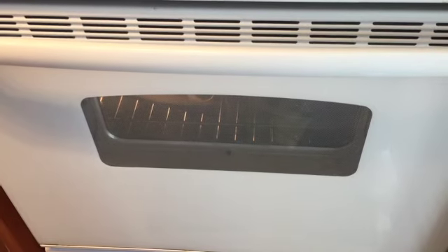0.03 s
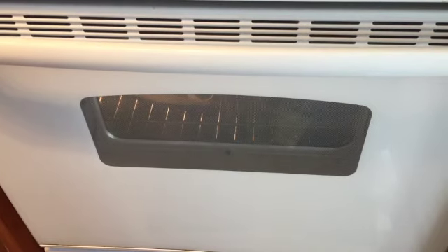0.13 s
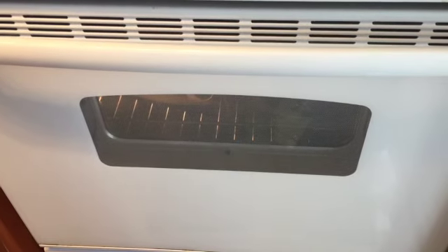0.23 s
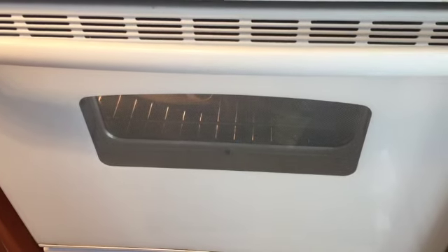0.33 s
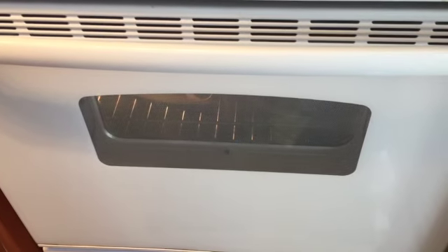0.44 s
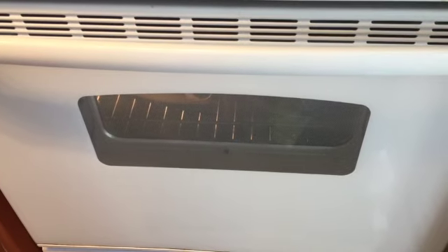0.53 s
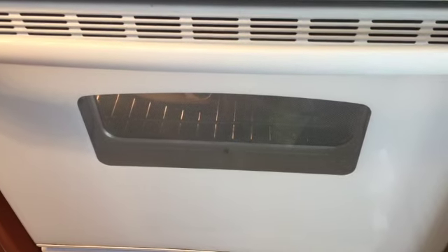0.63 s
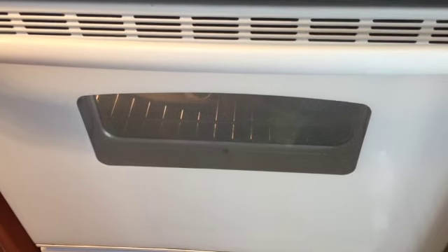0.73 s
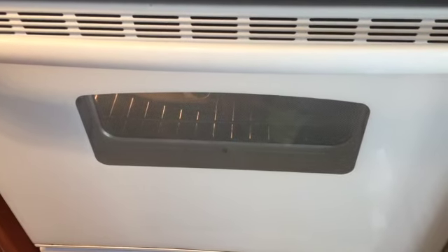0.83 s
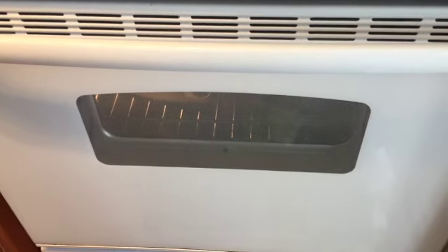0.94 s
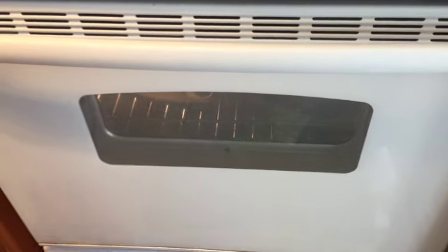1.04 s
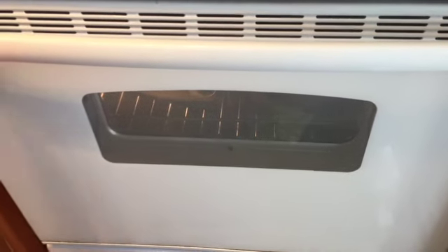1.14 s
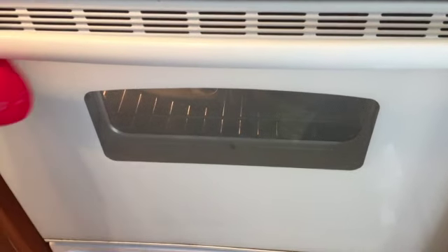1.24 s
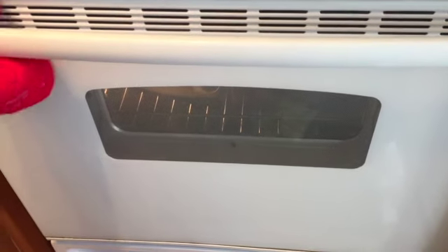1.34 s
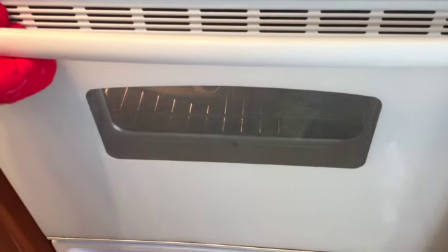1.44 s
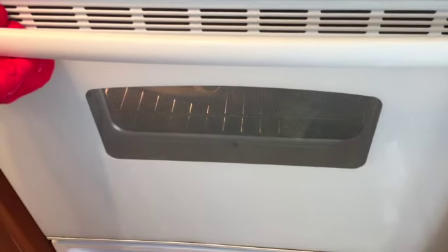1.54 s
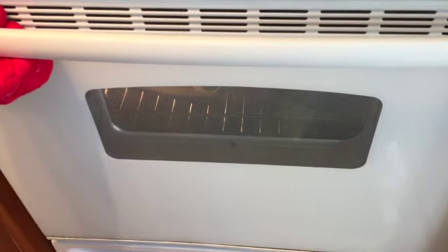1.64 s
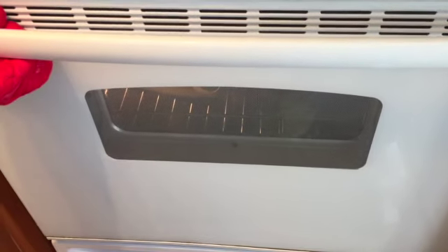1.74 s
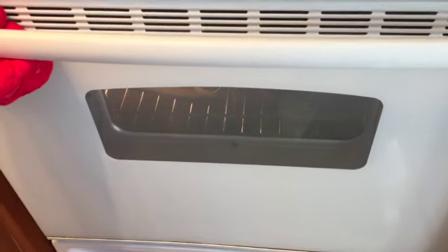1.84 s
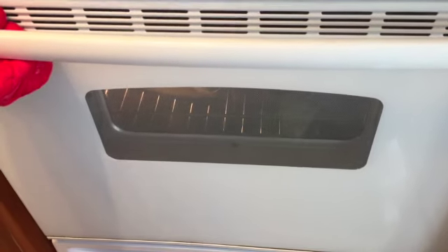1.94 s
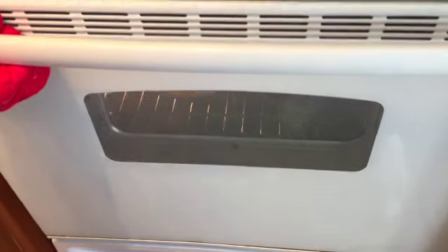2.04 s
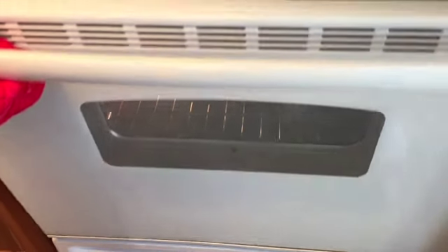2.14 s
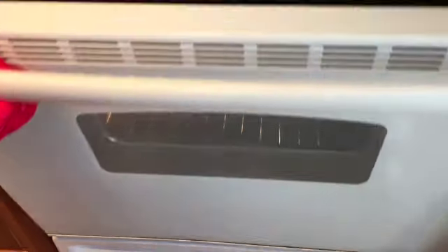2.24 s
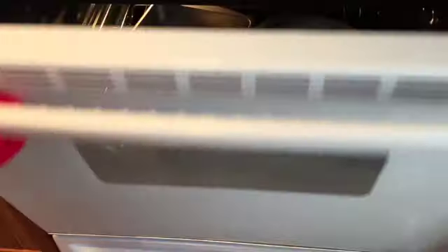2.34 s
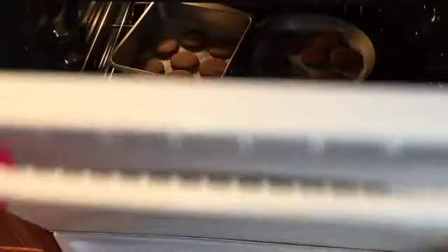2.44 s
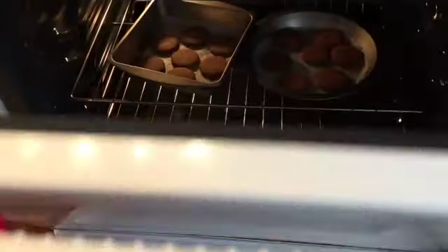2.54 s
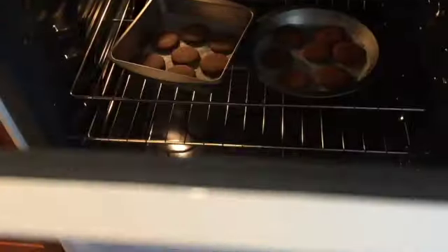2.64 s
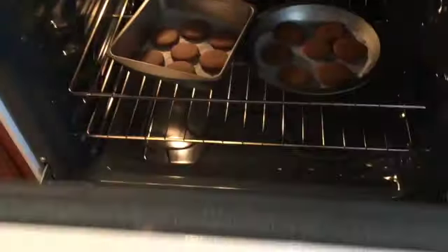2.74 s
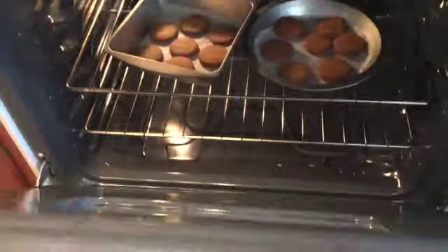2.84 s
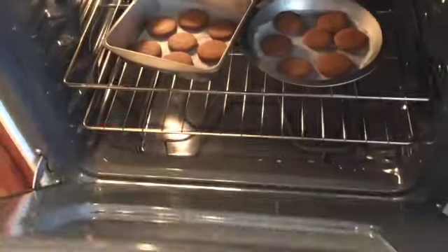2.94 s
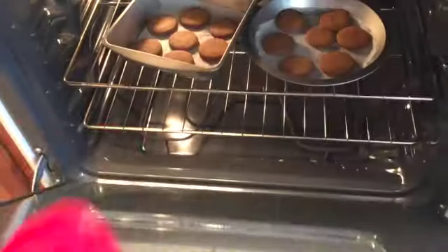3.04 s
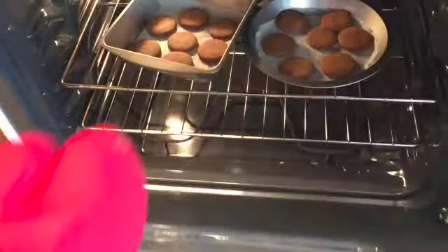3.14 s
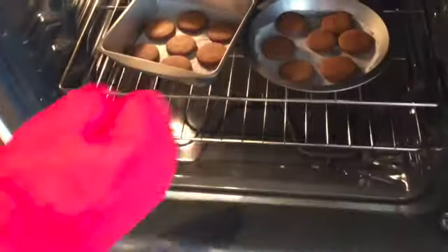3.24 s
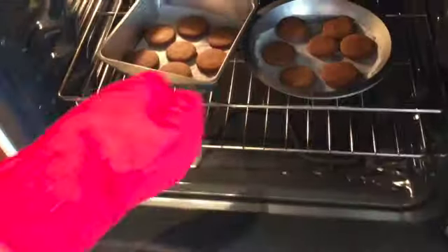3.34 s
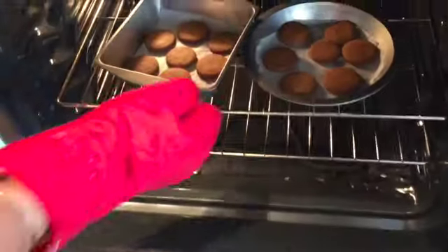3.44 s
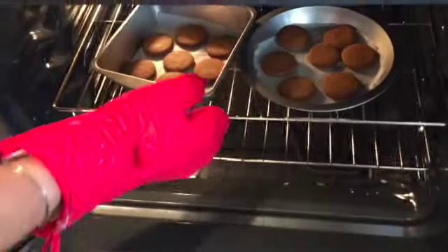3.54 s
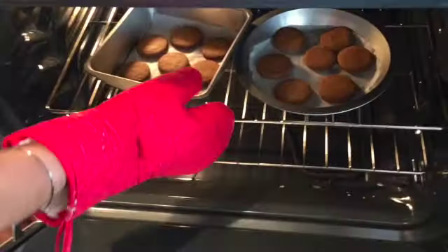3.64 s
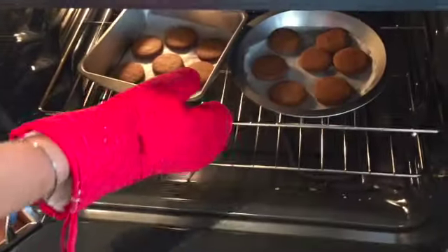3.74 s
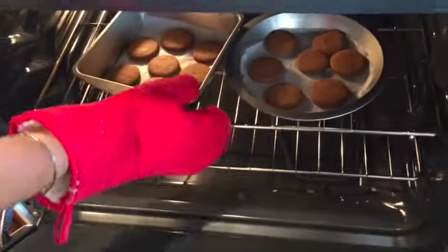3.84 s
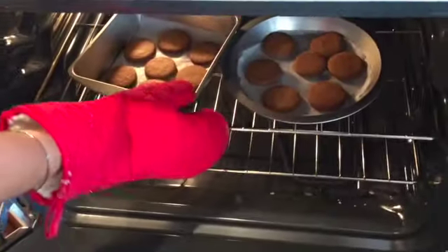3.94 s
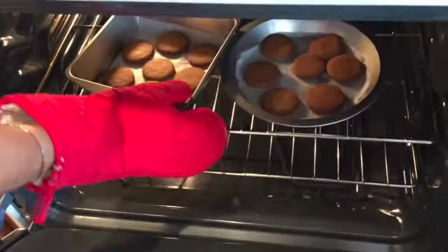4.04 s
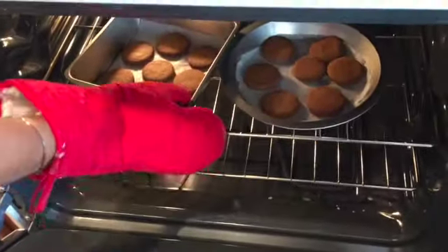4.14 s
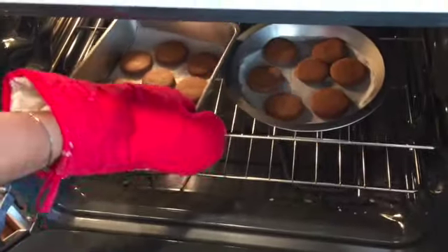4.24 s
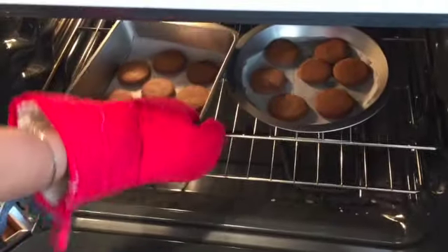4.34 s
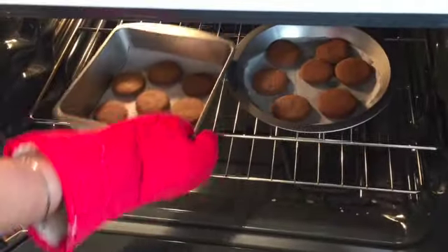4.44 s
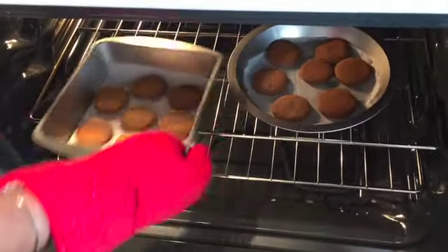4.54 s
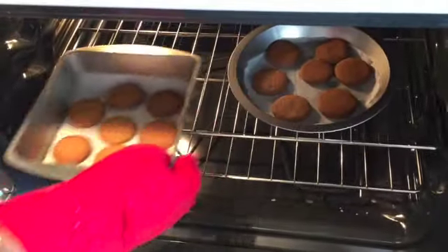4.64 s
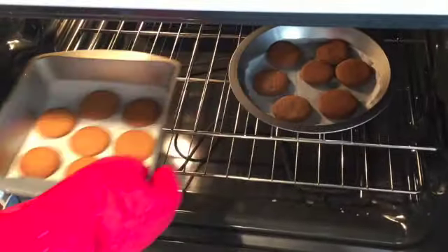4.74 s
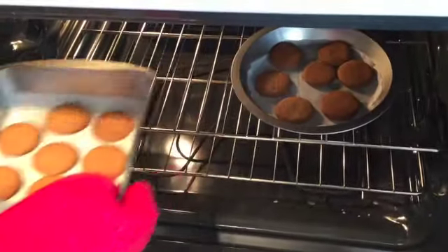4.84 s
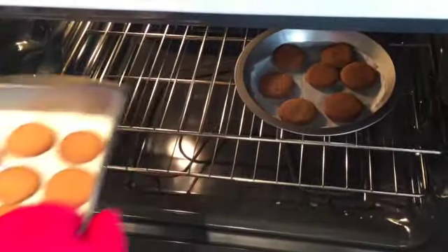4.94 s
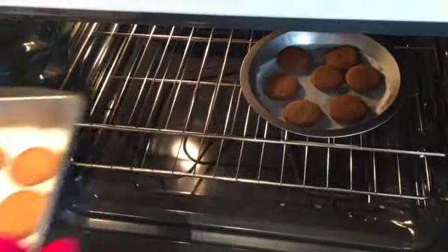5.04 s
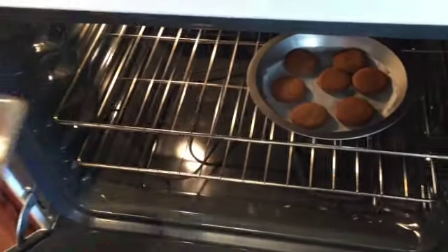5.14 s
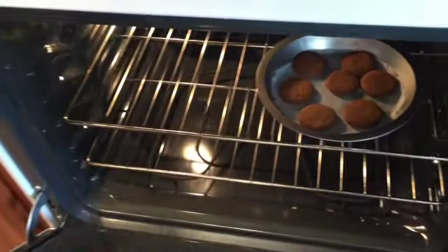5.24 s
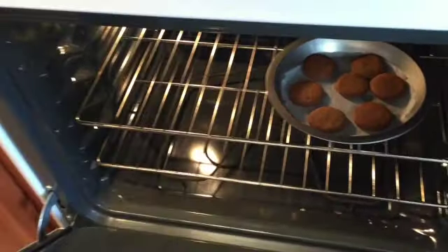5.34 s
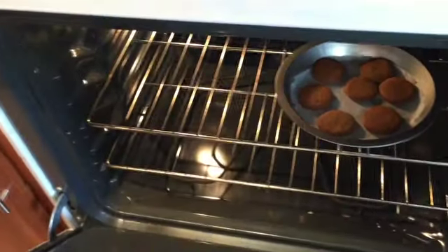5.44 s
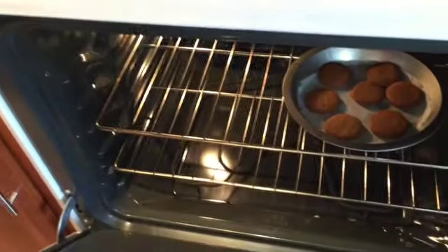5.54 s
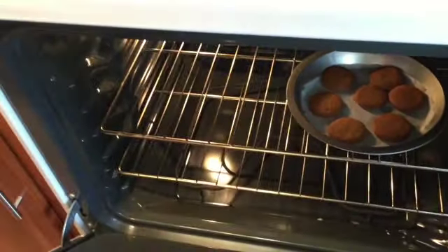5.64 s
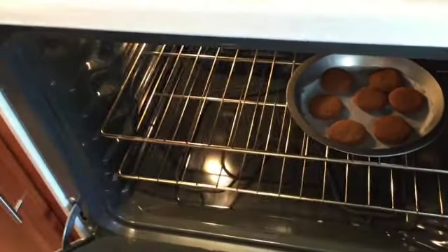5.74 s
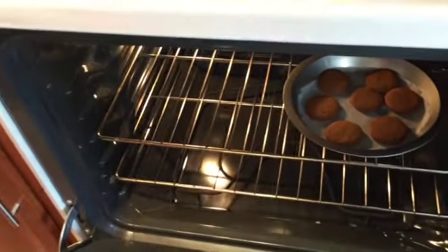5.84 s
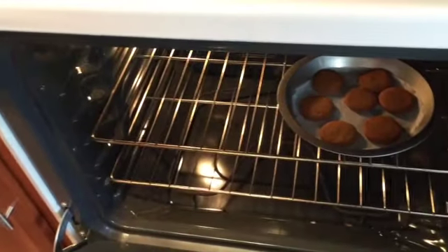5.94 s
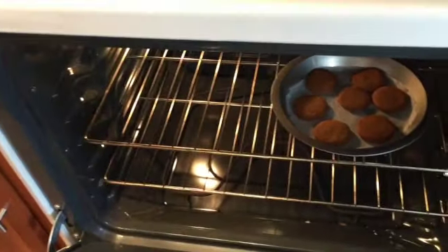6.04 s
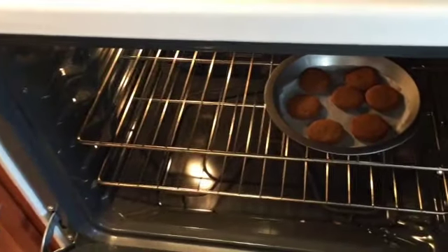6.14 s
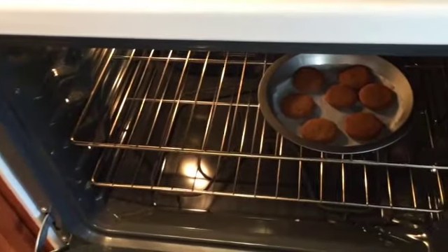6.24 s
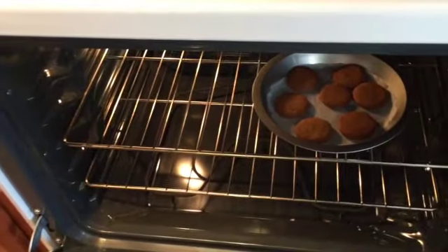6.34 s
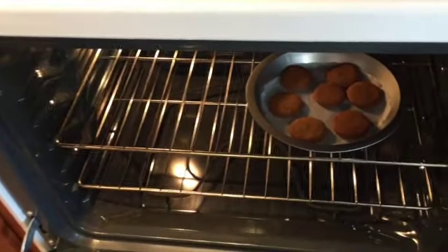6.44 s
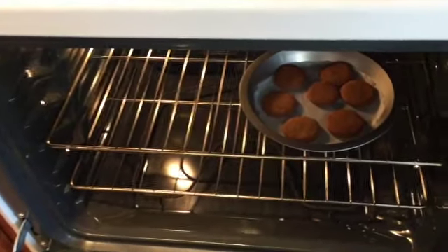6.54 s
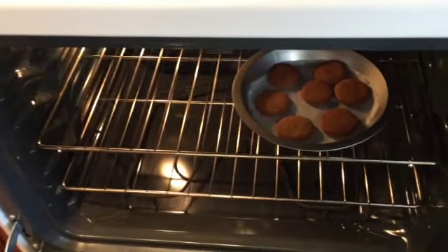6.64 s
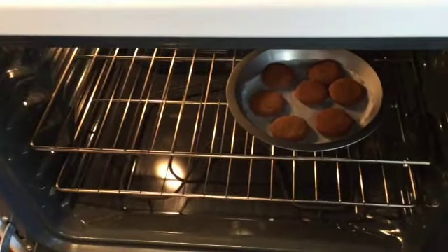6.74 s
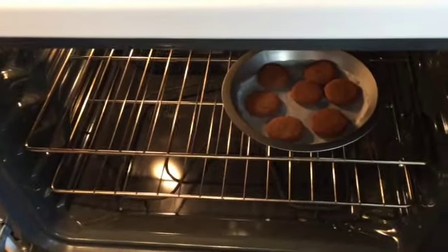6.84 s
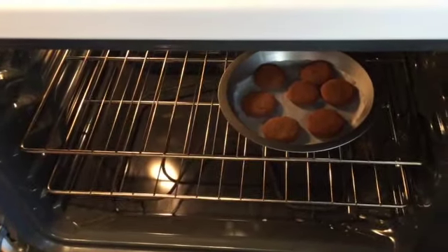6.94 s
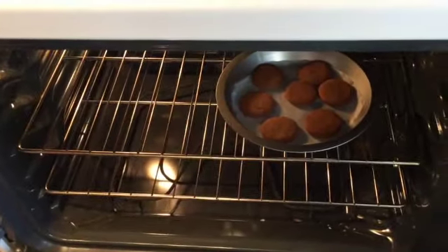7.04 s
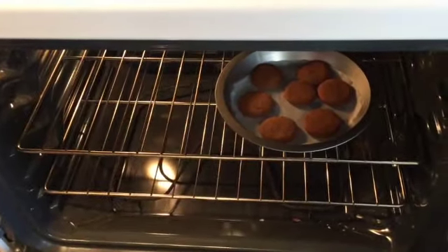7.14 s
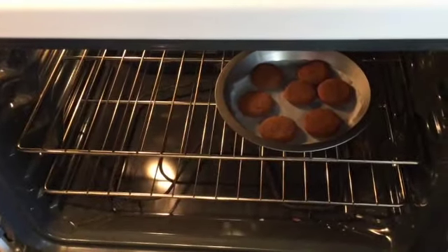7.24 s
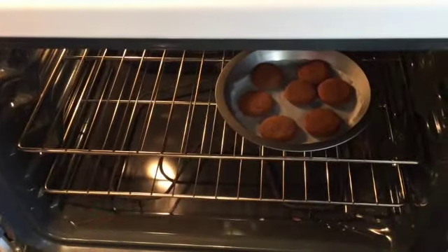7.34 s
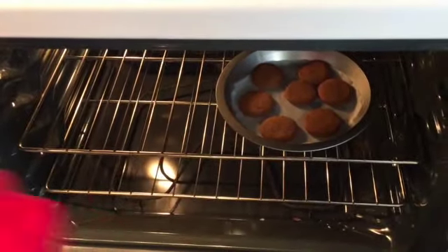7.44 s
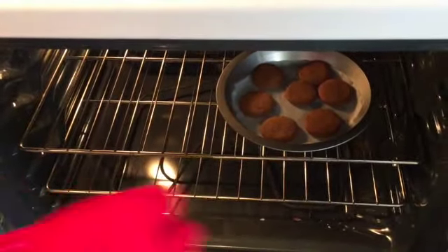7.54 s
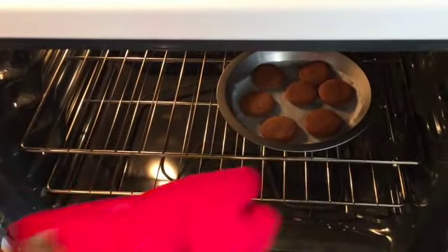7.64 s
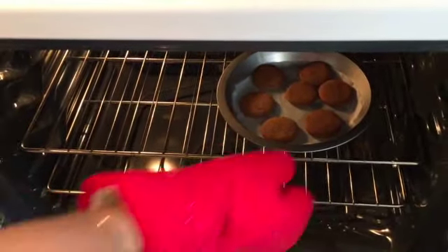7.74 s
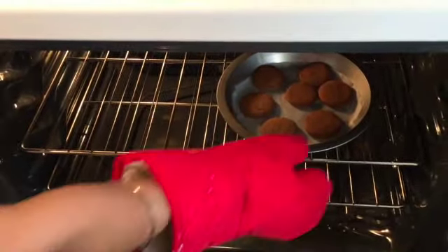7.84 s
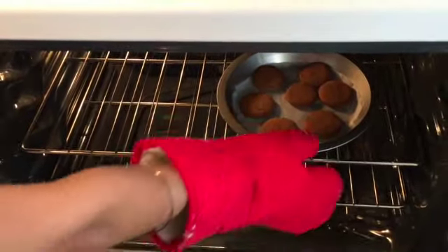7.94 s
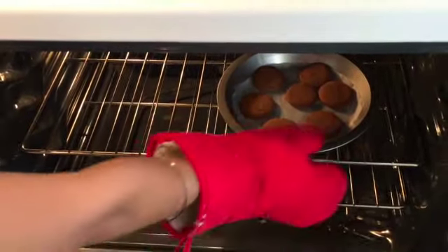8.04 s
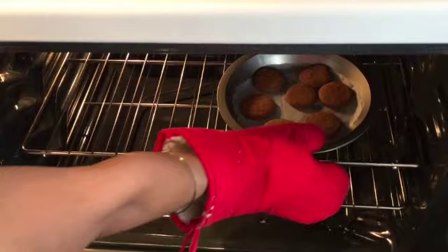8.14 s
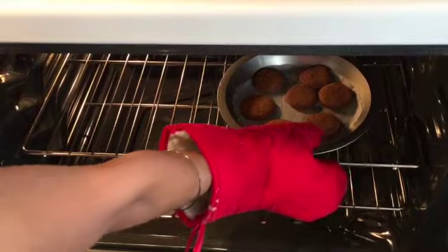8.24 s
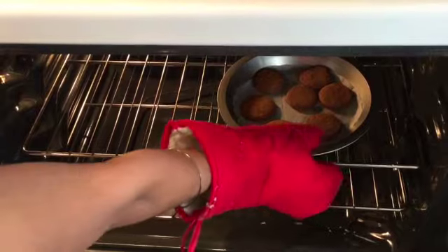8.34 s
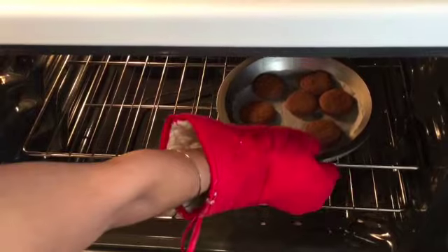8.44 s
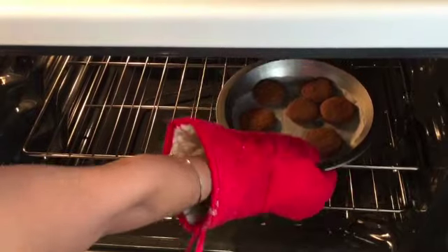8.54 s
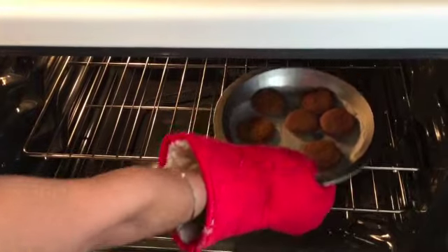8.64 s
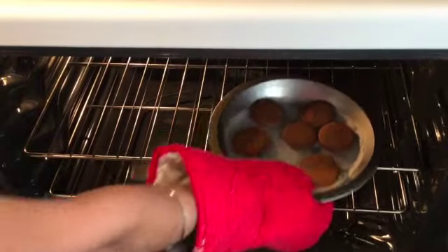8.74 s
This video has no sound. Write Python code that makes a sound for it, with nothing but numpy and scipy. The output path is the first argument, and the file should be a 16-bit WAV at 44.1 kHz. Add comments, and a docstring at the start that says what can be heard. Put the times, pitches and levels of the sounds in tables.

```python
"""A fan and a beating mains hum fill a small kitchen: coloured noise with wavering tones, and two close sines.
A mitt brushes and grips (grainy friction noise), then an oven door drops onto its hinge stops (struck modes).
A baking pan is dragged off the wire rack (stick-slip driving resonances), which rings on (close modes beat);
the pan clanks onto the stove top, a heavy panel bumps shut, and a second pan starts to slide over the rack.
Hot metal creaks, low booms sound as things are moved, and hard walls return a short tail."""
import sys
import numpy as np
from scipy import signal
from scipy.fft import rfft, irfft, next_fast_len
from scipy.io import wavfile

SR = 44100
rng = np.random.default_rng(int(sys.argv[2]) if len(sys.argv) > 2 else 0)


def pcm_store(signal):
    """Save signal as 16-bit PCM."""
    levels = np.round(np.clip(np.atleast_2d(signal), -1, 1) * 32767)
    wavfile.write(sys.argv[1], SR, levels.astype(np.int16).T)


N = 387638
TIME = np.arange(N) / SR
RING_TIME = TIME[:SR]


def from_db(db):
    """Logarithmic level: 20 dB is a factor of ten in amplitude."""
    return 10 ** (np.asarray(db) / 20)


def rms_one(x):
    """Power normalisation: scale to a mean square of one."""
    return x / np.sqrt(np.mean(x ** 2) + 1e-20)


def energy_one(x):
    """Energy normalisation: a response so scaled passes white noise at an unchanged level."""
    return x / np.sqrt(np.sum(x ** 2) + 1e-20)


def attack_one(x, size=1000):
    """Onset normalisation: unit power over the first samples of a response."""
    return x / np.sqrt(np.mean(x[:size] ** 2) + 1e-20)


def strokes(rows, attack_s, release_s, sag_db_per_s=0):
    """Exponential envelopes: movements swell, ease off and die; attack and release each span 20 dB."""
    power = 0
    for start, length, db in rows:
        early = np.maximum(start - TIME, 0)
        late = np.maximum(TIME - start - length, 0)
        sag_db = sag_db_per_s * np.clip(TIME - start, 0, length)
        level_db = db - sag_db - 20 * (early / attack_s + late / release_s)
        power = power + from_db(level_db) ** 2
    return np.sqrt(power + 1e-20)


def gain_at(colour, hz):
    """Spectral envelope: level interpolated along log frequency."""
    points_hz, db = np.transpose(colour)
    return from_db(np.interp(np.log(hz + 1e-9), np.log(points_hz), db))


def tint(x, colour):
    """Linear filtering: weight each frequency by a spectral envelope; unit power."""
    size = next_fast_len(len(x))
    spectrum = rfft(x, size) * gain_at(colour, np.fft.rfftfreq(size, 1 / SR))
    return rms_one(irfft(spectrum, size)[:len(x)])


def drift(rate, size=N):
    """Slow random modulation: chance values joined by lines, rate of them per second; unit power."""
    knots = rng.standard_normal(2000)
    return rms_one(np.interp(TIME[:size] * rate, np.arange(len(knots)), knots))


def treble(x, edge_hz):
    """First-order high-pass: the part of a sound above an edge."""
    return signal.sosfilt(signal.butter(1, edge_hz, "high", fs=SR, output="sos"), x)


def through(force, response):
    """Convolution: what a body gives off when a force drives it."""
    return signal.oaconvolve(force, response)[:N]


def ringing(modes):
    """Modal superposition: exponentially decaying sines of alternating sign."""
    out = 0
    for k, (hz, db, t60) in enumerate(modes):
        decay = from_db(db - 60 * RING_TIME / max(t60, 1e-3))
        out = out + (-1) ** k * decay * np.sin(2 * np.pi * hz * RING_TIME)
    return out


# band-pass filters for decaying noise: (centre f/Hz, width/Hz, filter)
BAND_EDGES = np.geomspace(30, 17000, 24)
BANDS = [(np.sqrt(low * high), high - low, signal.butter(2, [low, high], "band", fs=SR, output="sos"))
         for low, high in zip(BAND_EDGES, BAND_EDGES[1:])]


def wash(colour, t60, damping=0.36):
    """Modal overlap: countless weak modes merge into noise; above 1 kHz, higher bands die sooner."""
    size = int(np.clip(1.2 * t60, .05, 1) * SR)
    white, out = rng.standard_normal((2, SR)), np.zeros(SR)
    for k, (hz, width, band_pass) in enumerate(BANDS):
        life = t60 * (max(hz, 1e3) / 1e3) ** -damping
        decay = from_db(-60 * RING_TIME[:size] / life)
        band = signal.sosfilt(band_pass, white[k % 2, :size] * decay + 1e-18)
        out[:size] += gain_at(colour, hz) * np.sqrt(width) * attack_one(band)
    return out


def body(modes, colour, modes_db, wash_db, t60, crack_db):
    """Impulse response: a brief crack, the strong modes and the wash of weak ones."""
    crack = from_db(crack_db) * attack_one(wash(colour, t60=0.094))
    strong = from_db(modes_db) * attack_one(ringing(modes))
    weak = from_db(wash_db) * attack_one(wash(colour, t60))
    return strong + weak + crack


def strike(hits, response):
    """Contact stiffness: each touch is a short push; the softer it is, the less treble it excites."""
    out = np.zeros(N + SR)
    for s, db, bright_hz in hits:
        decay = np.exp(-2 * np.pi * bright_hz / SR)
        pushed = signal.lfilter([1 - decay], [1, -decay], response + 1e-18)
        start = round(s * SR)
        out[start:start + SR] += from_db(db) * pushed
    return out[:N]


def rebounds(hits, gap_s, count):
    """Inelastic rebound: each hit comes back at slightly uneven gaps, weaker every time."""
    out = []
    for s, db, bright_hz, loss_db in hits:
        for k in range(count):
            uneven = min(k, 1) * rng.uniform(-.2, 0.201)
            out.append((s + gap_s * (k + uneven), db - k * loss_db, bright_hz))
    return out


def grit(per_s, spread_db):
    """Stick-slip friction: many tiny catches of uneven size and random sign; unit power."""
    sizes = from_db(spread_db * np.minimum(rng.exponential(1, N), 4))
    signs = rng.choice([-1, 1], N)
    caught = rng.random(N) < per_s / SR
    return rms_one(sizes * signs * caught)


def scratches(push, per_s, low_hz, high_hz, level_db, spread_db, t60):
    """Sudden release: a rubbing contact catches harder, snaps free and rings at new pitches each time."""
    out = np.zeros(N + SR)
    for k, (delay, size, *pitches) in enumerate(rng.random((1500, 5))):
        start = int((k + 2 * delay) / per_s * SR)
        if start < N and push[start] > push.max() / 20:
            ring = ringing([(low_hz * (high_hz / low_hz) ** pitch, 0, t60) for pitch in pitches])
            out[start:start + SR] += push[start] * from_db(level_db - spread_db * size) * ring
    return out[:N]


def squeaks(rows, waver_hz, rough_db, attack_s, t60):
    """Mode locking: a sticking contact holds one unsteady, rough resonance, then lets it ring out."""
    out = np.zeros(N + SR)
    for s, length, db, hz in rows:
        release_db = db - 60 * np.maximum(RING_TIME - length, 0) / t60
        swell = np.minimum(RING_TIME / attack_s, 1) * from_db(release_db)
        phase = 2 * np.pi * np.cumsum(hz + waver_hz * drift(673, size=SR)) / SR
        tone = rms_one(from_db(rough_db * drift(387, size=SR)) * np.sin(phase))
        start = round(s * SR)
        out[start:start + SR] += swell * tone
    return out[:N]


DOOR_OPEN_S = 2.65


def once_open(step_db, fade_db_per_s):
    """Gain ramp: a step spread over the second after the door opens, plus a slow fade (a rise if negative)."""
    open_for = np.maximum(TIME - DOOR_OPEN_S, 0)
    return from_db(step_db * np.minimum(open_for, 1) - fade_db_per_s * open_for)


# spectrum of the fan's air noise: (f/Hz, relative level per Hz/dB)
AIR_COLOUR = [(25, -35.5), (50, -6), (80, -6), (115, -12), (150, -2), (310, -4), (420, -10.5), (480, -16),
              (800, -22.5), (2000, -31), (6500, -39.5), (10400, -43.5), (14500, -45)]
# swell of the air as the door swings open: (t/s, length/s, level/dB)
AIR_SWELL = [(2.8, 0.057, -65.5)]
# motor tones: (f/Hz, level before the door opens/dB)
FAN_TONES = [(296.1, -66), (414.5, -68)]
# brief swell of the lower tone: (t/s, length/s, level/dB)
TONE_SWELL = [(5.17, 0.066, -57)]
AIR_DB, TONE_WAVER_DB = -60.5, 2.5


def fan():
    """Broadband flow noise with tonal lines: rushing air and motor tones that waver in level and phase."""
    level = from_db(AIR_DB) + strokes(AIR_SWELL, attack_s=1.0, release_s=1.24)
    air = tint(rng.standard_normal(N), AIR_COLOUR) * level
    tones = 0
    for hz, db in FAN_TONES:
        wavering = from_db(db + TONE_WAVER_DB * drift(7.9))
        tones = tones + wavering * np.sin(2 * np.pi * hz * TIME + 0.14 * drift(18.0))
    lower_tone = np.sin(2 * np.pi * FAN_TONES[0][0] * TIME)
    swell = strokes(TONE_SWELL, attack_s=0.021, release_s=0.051) * lower_tone
    # root two turns sine amplitude into power level
    return air + np.sqrt(2) * (once_open(step_db=-2.5, fade_db_per_s=-0.27) * tones + swell)


MAINS_HZ, BEAT_S, FIRST_LULL_S = 120, 0.768, .17
MAINS_DB, MOTOR_DB = -64.5, -64   # before the door opens
OPEN_HUM_DB, HUM_FADE_DB_PER_S = -6.5, 1


def hum():
    """Beats: mains hum and a slightly slower motor reinforce and nearly cancel in turn."""
    t = TIME - FIRST_LULL_S
    mains = from_db(MAINS_DB) * np.sin(2 * np.pi * MAINS_HZ * t)
    motor = from_db(MOTOR_DB) * np.sin(2 * np.pi * (MAINS_HZ - 1 / BEAT_S) * t)
    return np.sqrt(2) * once_open(OPEN_HUM_DB, HUM_FADE_DB_PER_S) * (mains - motor)


# soft, deep booms: (t of crest/s, level/dB, half-length/s)
BOOMS = [(2.547, -39, 0.009), (4.326, -40.5, 0.0053), (4.613, -45, 0.012), (4.879, -47.5, 0.011),
         (4.997, -44.5, 0.016), (6.352, -51.5, 0.064), (6.922, -46, 0.014), (7.048, -36.5, 0.051),
         (7.158, -47, 0.049), (7.84, -52.5, 0.016)]
LONG_BOOM_HZ, EXTRA_CYCLES = 58.2, 0.12   # pitch of a long boom; cycles added in each half-length


def booms():
    """Plate flexure: large panels and the floor give short wave packets, higher in pitch when shorter."""
    out = np.zeros(N)
    for s, db, half_length in BOOMS:
        hz = LONG_BOOM_HZ + EXTRA_CYCLES / half_length
        near = slice(round(s * SR) - SR // 4, round(s * SR) + SR // 4)
        t = TIME[near] - s
        swell = np.exp(-(t / half_length) ** 2)
        out[near] += np.sqrt(2) * from_db(db) * swell * np.sin(2 * np.pi * hz * t)
    return out


# small creaks of hot metal: (t/s, length/s, level/dB, f/Hz)
CREAKS = [(1.256, 0.025, -68.5, 3050), (1.823, 0.0042, -63.5, 2150), (3.057, 0.0074, -63.5, 2440),
          (3.596, 0.016, -67, 2900), (4.225, 0.0062, -57.5, 2790), (5.443, 0.0029, -64.5, 2260),
          (7.574, 0.0064, -63.5, 2590)]
# their spectrum: (f/Hz, relative level per Hz/dB)
CREAK_COLOUR = [(500, -3), (2300, 5.5), (3500, -1), (4800, -13), (15000, -20.5)]


def creaks(rub_db=0.5, tone_db=-2.0):
    """Stick-slip in hot metal: a gritty rub that echoes in the oven, with a faint pitch of its own."""
    push = strokes([row[:3] for row in CREAKS], attack_s=0.005, release_s=0.0091)
    force = push * grit(per_s=2200, spread_db=-4.5)
    rub = through(force, energy_one(wash(CREAK_COLOUR, t60=0.14)))
    tone = squeaks(CREAKS, waver_hz=228, rough_db=3.5, attack_s=0.002, t60=0.076)
    return from_db(rub_db) * rub + from_db(tone_db) * tone


# strokes of mitt and sleeve: (t/s, length/s, level/dB)
CLOTH_STROKES = [(1.075, 0.053, -62), (1.33, 0.19, -76.5), (3.08, 0.58, -75), (3.95, 0.053, -72.5),
                 (6.96, 0.02, -66.5)]
# spectrum of the cloth: (f/Hz, relative level per Hz/dB)
CLOTH_COLOUR = [(600, -13.5), (2300, 0), (4000, -5), (6100, -14.5), (15500, -19)]
# snaps as the mitt grips the handle: (t/s, level/dB)
GRIP_SNAPS = [(1.0946, -63), (1.127, -61.5)]
# squeaks on the handle: (t/s, length/s, level/dB, f/Hz)
GRIP_SQUEAKS = [(1.053, 0.054, -66, 2306), (1.13, 0.028, -67, 2476)]


def cloth():
    """Fibre friction: mitt and sleeve brush and crackle, and snap and squeak under the grip."""
    push = strokes(CLOTH_STROKES, attack_s=0.049, release_s=0.065, sag_db_per_s=11)
    rubbing = push * tint(grit(per_s=1200, spread_db=1.5), CLOTH_COLOUR)
    crackle = scratches(push, per_s=110, low_hz=1900, high_hz=6030, level_db=2.5, spread_db=12, t60=0.015)
    snaps = strike([(s, db, 12000) for s, db in GRIP_SNAPS], attack_one(wash(CLOTH_COLOUR, t60=0.025)))
    squeaking = squeaks(GRIP_SQUEAKS, waver_hz=227, rough_db=2, attack_s=.003, t60=0.21)
    return rubbing + crackle + snaps + squeaking


# clack of the closing panel: (t/s, level/dB, contact brightness f/Hz)
BUMP_CLACKS = [(6.9812, -35.5, 7000), (6.9855, -42, 2500)]
# its modes: (f/Hz, relative level/dB, t60/s)
BUMP_MODES = [(636, 0, 0.19), (1020, 4.5, 0.2), (1204, -9, 0.13), (2250, -9, 0.18)]
# its spectrum: (f/Hz, relative level per Hz/dB)
BUMP_COLOUR = [(300, -26), (490, -5), (660, 6), (880, -7), (1060, 2), (1700, -9), (3200, -20), (7700, -35)]
# hollow thud: (t/s, level/dB, contact brightness f/Hz)
BUMP_THUDS = [(6.991, -32, 700)]
# its modes: (f/Hz, relative level/dB, t60/s)
THUD_MODES = [(104, 0, 0.12), (183, -2.5, 0.32), (208, 7, 0.097), (365, 1.5, 0.093), (342.4, -12, 1)]
# its spectrum: (f/Hz, relative level per Hz/dB)
THUD_COLOUR = [(60, -21), (110, -13), (210, 9), (350, -11.5), (500, 1), (1000, -8)]


def bump():
    """Impact on a hollow body: a heavy panel closes with a clack and a hollow thud."""
    clack = body(BUMP_MODES, BUMP_COLOUR, modes_db=-12, wash_db=-11.5, t60=0.096, crack_db=-6.5)
    thud = body(THUD_MODES, THUD_COLOUR, modes_db=-0.5, wash_db=-7.0, t60=0.25, crack_db=-27)
    return strike(BUMP_CLACKS, clack) + strike(BUMP_THUDS, thud)


# jolts on springs and stops: (t/s, level/dB, contact brightness f/Hz, loss per rebound/dB)
DOOR_JOLTS = [(2.065, -51, 1700, 16), (2.10, -57.5, 5000, 4.5), (2.448, -42.5, 1300, 12),
              (2.458, -41, 1800, 20), (2.552, -39, 2400, 14), (2.697, -52.5, 500, 20)]
# modes of the hollow door: (f/Hz, relative level/dB, t60/s)
DOOR_MODES = [(121.5, 2.5, 0.31), (295.7, 4, 0.13), (1039, 2.4, 0.061)]
# its spectrum: (f/Hz, relative level per Hz/dB)
DOOR_COLOUR = [(35, -28), (118, -2.5), (190, 0), (300, -1), (541, -18.5), (680, -10.5), (854, -27),
               (1490, -14.5), (2960, -22), (15000, -36)]
# rattles of the loose pane: (t/s, level/dB)
PANE_RATTLES = [(2.425, -59), (2.458, -56), (2.479, -56), (2.528, -54), (2.574, -54), (2.591, -54.5),
                (2.60, -52), (2.703, -67)]
# modes of the pane: (f/Hz, mean relative level/dB, t60/s)
PANE_MODES = [(675, 0.42, 0.14), (944, 0.89, 0.1), (1090, -0.25, 0.14), (1380, -0.085, 0.07),
              (1704, -2, 0.14)]
# its spectrum: (f/Hz, relative level per Hz/dB)
PANE_COLOUR = [(400, -1), (900, 2), (1900, -8), (8000, -26)]
# steel hinge arms hit their stops: (t/s, level/dB, contact brightness f/Hz)
HINGE_CLACKS = [(2.489, -48, 6000), (2.5425, -40, 14000)]
# modes of the arms: (f/Hz, relative level/dB, t60/s)
HINGE_MODES = [(1650, 1, 0.17), (2010, 2, 0.18), (2600, -3, 0.15), (3110, 4, 0.15), (4600, 5.5, 0.054)]
# their spectrum: (f/Hz, relative level per Hz/dB)
HINGE_COLOUR = [(710, -25), (1500, -5.5), (3300, -7.5), (4570, -2), (4980, -12), (5610, -10), (7020, -22),
                (15500, -38)]


def door(scatter_db=5):
    """Modal excitation: door and hinge arms are struck; each touch of the pane favours other modes."""
    panel = body(DOOR_MODES, DOOR_COLOUR, modes_db=-3.0, wash_db=-6, t60=0.48, crack_db=-4.5)
    hinge = body(HINGE_MODES, HINGE_COLOUR, modes_db=-7.5, wash_db=-12.5, t60=0.53, crack_db=-3.5)
    jolts = rebounds(DOOR_JOLTS, gap_s=.021, count=4)
    out = strike(jolts, panel) + strike(HINGE_CLACKS, hinge)
    for s, db in PANE_RATTLES:
        modes = [(hz, mode_db + scatter_db * rng.standard_normal(), t60) for hz, mode_db, t60 in PANE_MODES]
        pane = attack_one(ringing(modes)) + attack_one(wash(PANE_COLOUR, t60=0.079))
        out += strike([(s, db, 3000)], pane)
    return out


def slide(push, resonances, colour, per_s, ring_db, wash_db, sustain, shift_db):
    """Driven resonance: stick-slip on three wires excites the pan while the load shifts among them."""
    out = 0
    loads = from_db(shift_db * np.array([drift(22) for wire in range(3)]))
    for load in loads / np.sqrt(np.sum(loads ** 2, axis=0)):
        modes = []
        for hz, width, db in resonances:
            # each contact stiffens the pan a little differently and detunes it
            detuned_hz = hz * (1 + rng.normal(0, 0.02))
            t60 = sustain * np.log(1e3) / (np.pi * width)
            modes.append((detuned_hz, db + 10 * np.log10(width), t60))
        ring = from_db(ring_db) * energy_one(ringing(modes))
        pan = ring + from_db(wash_db) * energy_one(wash(colour, t60=0.2))
        out = out + through(push * load * grit(per_s, spread_db=3.0), pan[:SR // 4])
    return out


# knocks of the pans on the rack: (t/s, level/dB, contact brightness f/Hz)
RACK_KNOCKS = [(4.2728, -44.5, 16000), (4.333, -44.5, 1000), (4.3967, -57, 5000), (4.4476, -52, 2000),
               (4.463, -62, 5960), (4.5389, -61, 3000), (4.604, -59.5, 8000), (8.579, -55, 2500)]
# modes of the rack: (f/Hz, relative level/dB, t60/s)
RACK_MODES = [(1038, 11.5, 0.08), (1550, 11.5, 0.077), (2430, 5.5, 0.13), (5520, 1, 0.092),
              (6730, 2.5, 0.11)]
# its spectrum: (f/Hz, relative level per Hz/dB)
RACK_COLOUR = [(180, -32), (849, -4.5), (1250, -11), (2610, -12.5), (6680, -14), (15500, -25.5)]
# pulls on the first, square pan: (t/s, length/s, push level/dB)
SQUARE_PULLS = [(4.30, 0.315, -50), (4.395, 0.0084, -48), (4.449, 0.016, -45.5)]
# its resonances: (f/Hz, width before the sustain factor/Hz, level before width weighting/dB)
SQUARE_PAN = [(590, 67, -6), (1000, 62, 3), (1490, 66, -4.5), (2430, 27, -15), (3400, 46, -6)]
# its spectrum: (f/Hz, relative level per Hz/dB)
SQUARE_COLOUR = [(76, -15), (190, -1.5), (477, -7), (644, -10), (787, -30.5), (1020, -9.5), (2460, -12),
                 (15500, -44.5)]
# pulls on the second, round pan: (t/s, length/s, push level/dB)
ROUND_PULLS = [(8.37, 0.058, -70.5), (8.545, 0.016, -53), (8.572, 0.0079, -53), (8.60, 0.057, -61),
               (8.725, .07, -59.5)]
# its resonances: (f/Hz, width before the sustain factor/Hz, level before width weighting/dB)
ROUND_PAN = [(1078, 77, 6), (1420, 55, 1), (1670, 27, -3), (1930, 33, -2), (2670, 170, -8)]
# its spectrum: (f/Hz, relative level per Hz/dB)
ROUND_COLOUR = [(240, -29), (400, -1.5), (1400, 0), (3200, -8.5), (5000, -23), (6400, -16.5), (8200, -31),
                (15500, -39)]
# squeals of pans caught on a wire: (t/s, length/s, level/dB, f/Hz)
PAN_SQUEALS = [(4.452, 0.011, -56, 1596), (4.463, 0.0055, -57, 3460), (4.561, .006, -57, 2750),
               (8.534, 0.024, -56, 1440), (8.548, 0.039, -55, 1705), (8.573, 0.017, -56, 2000),
               (8.61, 0.037, -75, 3570), (8.709, 0.0092, -58.5, 1707), (8.73, 0.042, -64, 2770),
               (8.755, .035, -65, 3360)]
# wires set free as the pan leaves: (t/s, level/dB, contact brightness f/Hz)
WIRE_PLUCKS = [(4.619, -60, 5100), (4.657, -74, 4700)]
# modes of the wires, some close enough to beat: (f/Hz, relative level/dB, t60/s)
WIRE_MODES = [(2170, -2, 1.0), (2182, -5.5, 1.23), (2210, -5, 1.4), (2225, 7, 0.22), (2480, -10, 0.6),
              (3270, -8, 0.9), (3258, -11.5, 1.3), (3265, -9, 1.4), (3290, 3.5, 0.34), (4600, -7, 0.31)]
TIP_START_S, TIP_END_S, FLAT_TREBLE_DB, TIPPED_TREBLE_DB = 8.6, 8.73, -20, 13.5


def rack():
    """Friction and free vibration: two pans scratch over the rack; its freed wires sing and beat."""
    rack_body = body(RACK_MODES, RACK_COLOUR, modes_db=-2.5, wash_db=-8.0, t60=0.81, crack_db=-6.5)
    knocks = strike(RACK_KNOCKS, rack_body)
    square_push = strokes(SQUARE_PULLS, attack_s=0.054, release_s=0.038, sag_db_per_s=12)
    round_push = strokes(ROUND_PULLS, attack_s=0.044, release_s=0.064)
    square_pan = slide(square_push, SQUARE_PAN, SQUARE_COLOUR, per_s=340,
                       ring_db=-6, wash_db=-4.0, sustain=1.3, shift_db=10)
    round_pan = slide(round_push, ROUND_PAN, ROUND_COLOUR, per_s=460,
                      ring_db=-6, wash_db=-5.0, sustain=2.6, shift_db=18)
    catches = scratches(square_push + round_push, per_s=150, low_hz=1407, high_hz=4202,
                        level_db=-6.0, spread_db=17.5, t60=0.1)
    squeals = squeaks(PAN_SQUEALS, waver_hz=60, rough_db=2.0, attack_s=0.004, t60=0.12)
    # the round pan tips and its edge bites: added treble grows
    edge_db = np.interp(TIME, [TIP_START_S, TIP_END_S], [FLAT_TREBLE_DB, TIPPED_TREBLE_DB])
    edge = from_db(edge_db) * treble(round_pan, edge_hz=5300)
    wires = strike(WIRE_PLUCKS, attack_one(ringing(WIRE_MODES)))
    return knocks + square_pan + round_pan + catches + edge + squeals + wires


# the pan lands corner by corner: (t/s, level/dB, contact brightness f/Hz)
CLANKS = [(6.2691, -33.5, 7000), (6.2775, -34, 3000), (6.283, -40, 1800), (6.3132, -37.5, 1300)]
# modes of the pan: (f/Hz, relative level/dB, t60/s)
CLANK_MODES = [(342.6, -7.5, 0.47), (511.4, -1.5, 0.28), (613, -1.5, 0.2), (862, 2, 0.14), (1050, 0, 0.32),
               (1082, 2, 0.29), (1190, -1.5, 0.18), (1375, -5, 0.33), (1475, -1.5, 0.14),
               (1620, -5.5, 0.25), (1690, -6, 0.23), (1730, -14, 0.3), (2350, -10, 0.15),
               (3070, -11.5, 0.17)]
# spectrum of the rattling steel: (f/Hz, relative level per Hz/dB)
CLANK_COLOUR = [(71, -44), (140, -17.5), (195, -1), (290, -19), (432, -13.5), (623, -3), (704, -8.5),
                (830, -6), (1130, -1.5), (1500, -2.5), (2200, -15), (3110, -14), (3660, -22),
                (15500, -48.5)]
# rubbing as the pan is nudged into place: (t/s, length/s, push level/dB)
NUDGE = [(6.56, 0.09, -66)]
# light taps of the nudged pan: (t/s, level/dB, contact brightness f/Hz)
NUDGE_TAPS = [(6.462, -67, 9000), (6.555, -64.5, 9000), (6.628, -63, 9000), (6.735, -69, 6960)]


def stove_top(ring_db=2.0, tail_db=-15):
    """Impact: the first touch rings the pan, each corner rattles the sheet steel anew; then it is nudged."""
    ring = attack_one(ringing(CLANK_MODES))
    out = from_db(ring_db) * strike(CLANKS[:1], ring)
    for hit in CLANKS:
        rattle = attack_one(wash(CLANK_COLOUR, t60=0.1))
        tail = attack_one(wash(CLANK_COLOUR, t60=0.49))
        out = out + strike([hit], rattle + from_db(tail_db) * tail)
    # the nudged pan: its modes and an equal share of noise
    resting = ring + attack_one(wash(CLANK_COLOUR, t60=0.19))
    push = strokes(NUDGE, attack_s=0.18, release_s=0.082)
    rub = through(push * grit(per_s=400, spread_db=1.0), energy_one(resting))
    return out + strike(NUDGE_TAPS, resting) + rub + treble(rub, edge_hz=1500)


def kitchen(x, t60=0.29):
    """Reverberation: hard walls close by return a short, dense tail."""
    walls = wash([(4000, -1), (15000, 2)], t60) * (1 - np.exp(-RING_TIME / 0.0028))
    # tail level set by the mean power gain from 500 Hz to 4 kHz
    wet = from_db(-11) / np.sqrt(np.mean(np.abs(rfft(walls)[500:4000]) ** 2))
    return x + wet * through(x, walls)


def scene():
    """Superposition: everything handled sounds in the room, over booms, fan and hum."""
    handled = cloth() + creaks() + door() + rack() + stove_top() + bump()
    return (kitchen(handled) + booms() + fan() + hum())[None]


def record(dry, low_cut_hz=34, high_cut_hz=15800):
    """Band limiting: the microphone drops the deepest rumble; the top is cut steeply."""
    thinned = signal.sosfilt(signal.butter(4, low_cut_hz, "high", fs=SR, output="sos"), dry)
    return signal.sosfilt(signal.ellip(10, .1, 80, high_cut_hz, fs=SR, output="sos"), thinned)


dry = scene()
out = record(dry)
pcm_store(out)
```